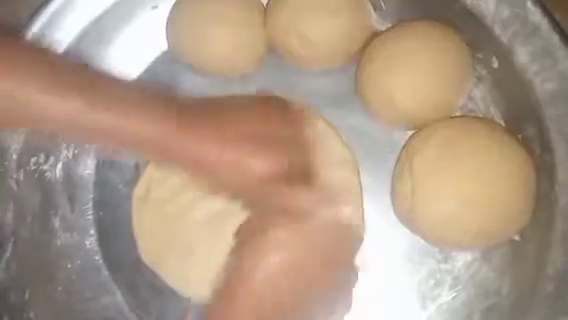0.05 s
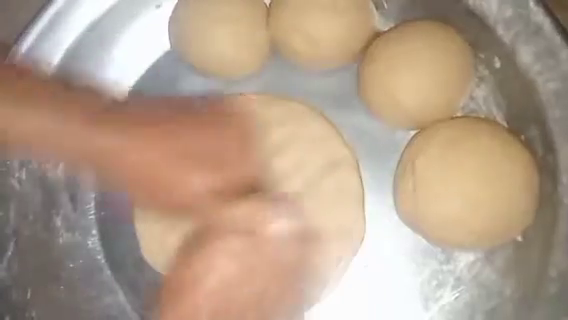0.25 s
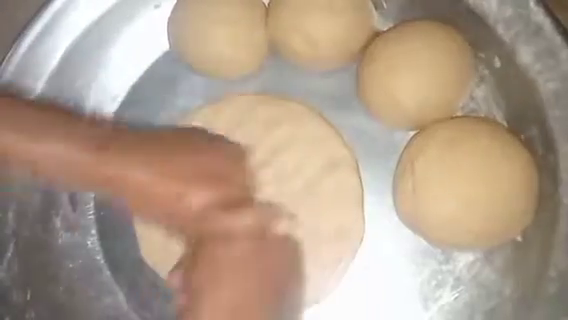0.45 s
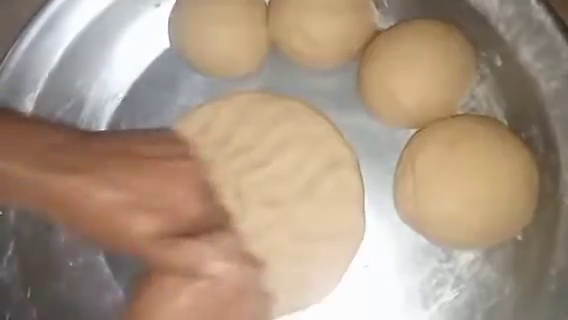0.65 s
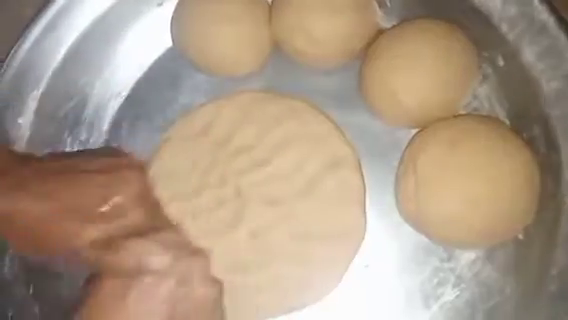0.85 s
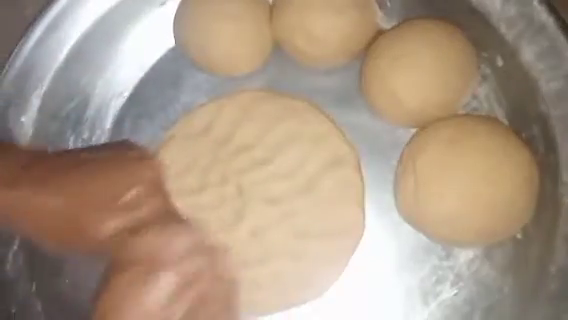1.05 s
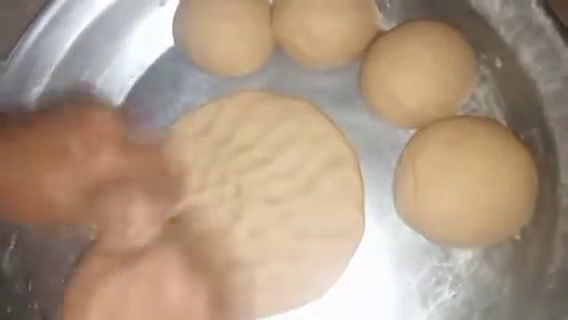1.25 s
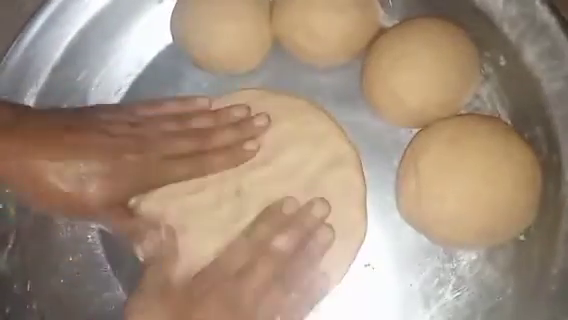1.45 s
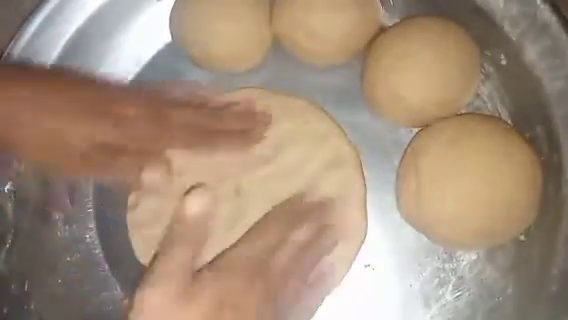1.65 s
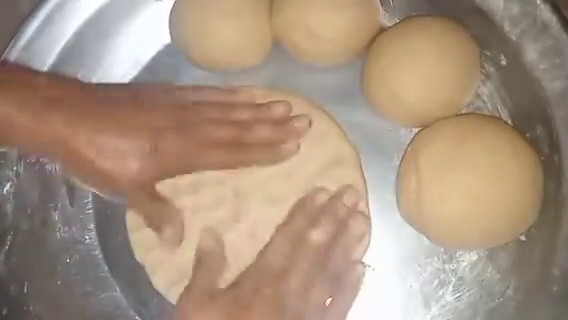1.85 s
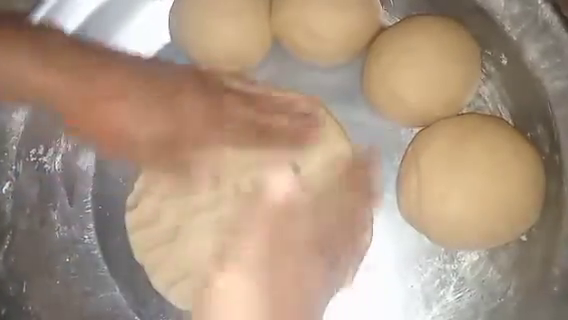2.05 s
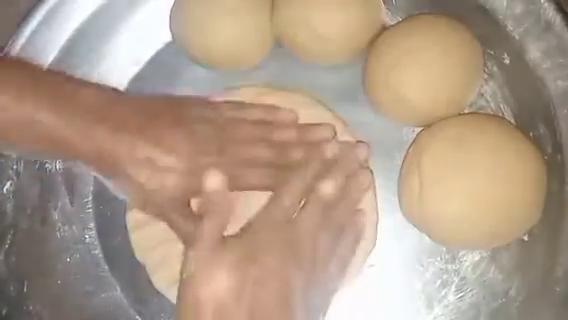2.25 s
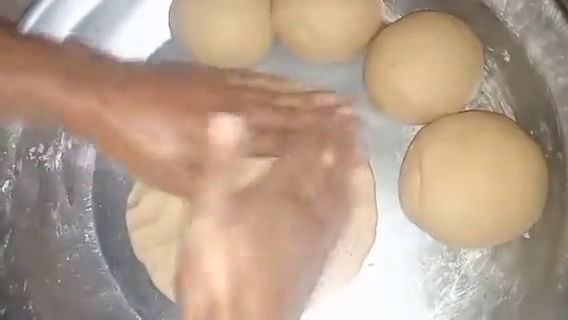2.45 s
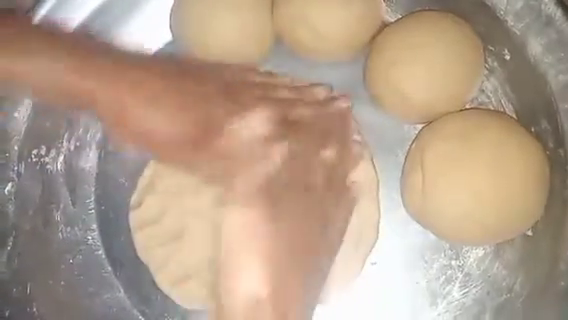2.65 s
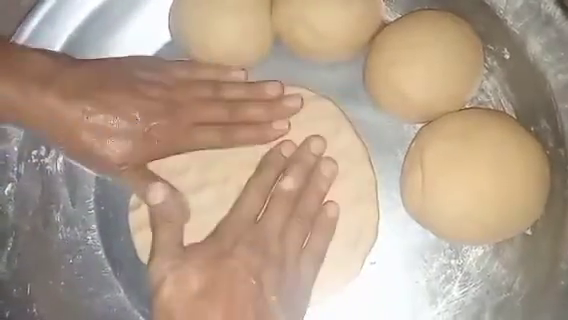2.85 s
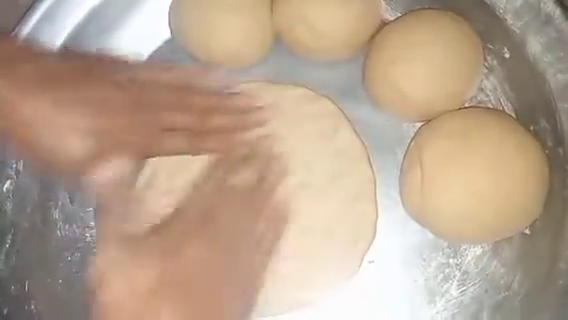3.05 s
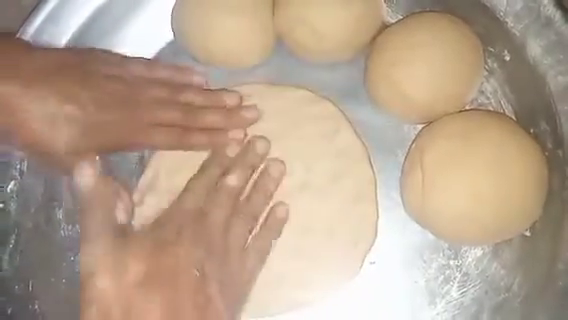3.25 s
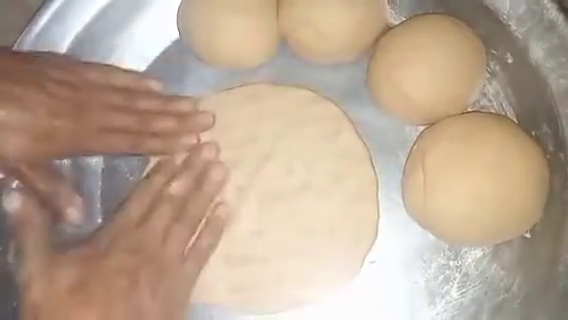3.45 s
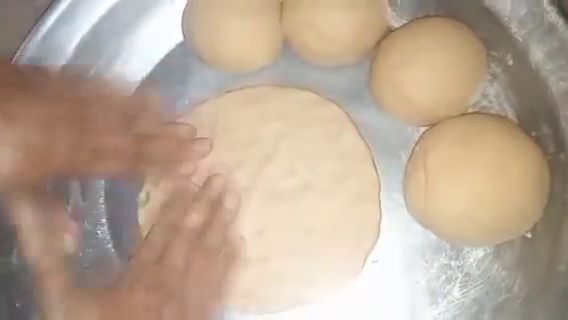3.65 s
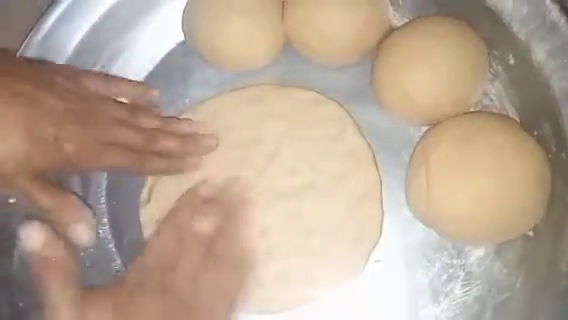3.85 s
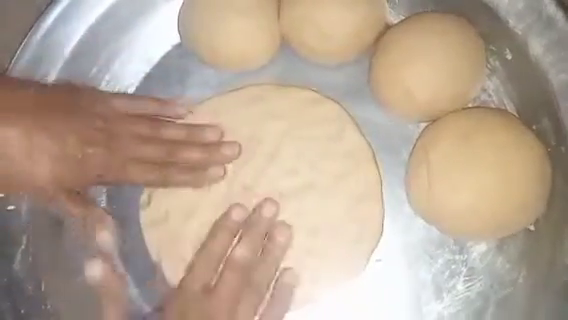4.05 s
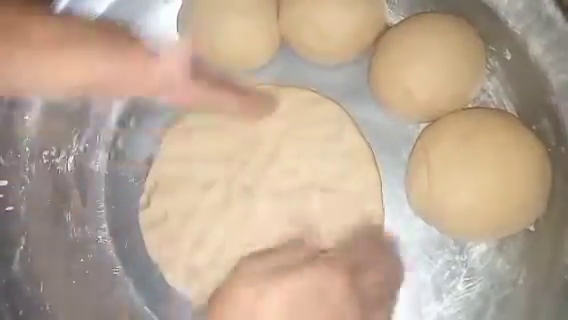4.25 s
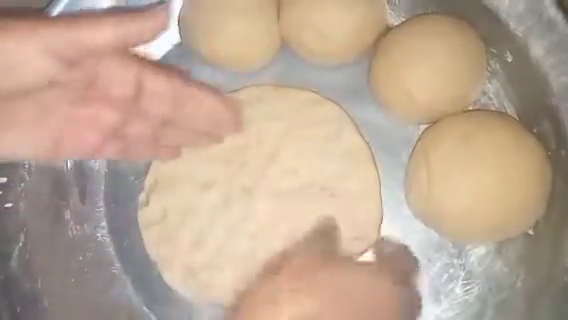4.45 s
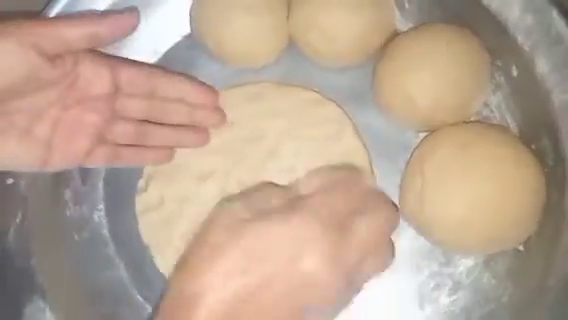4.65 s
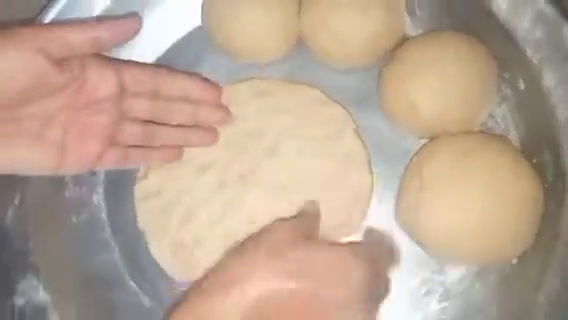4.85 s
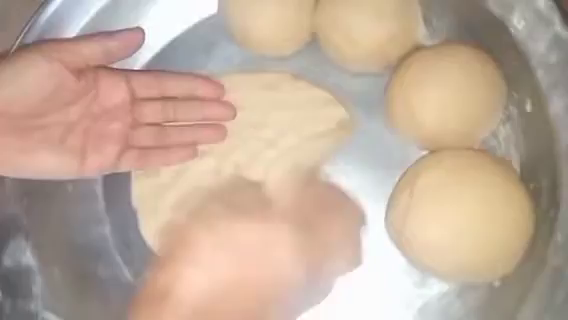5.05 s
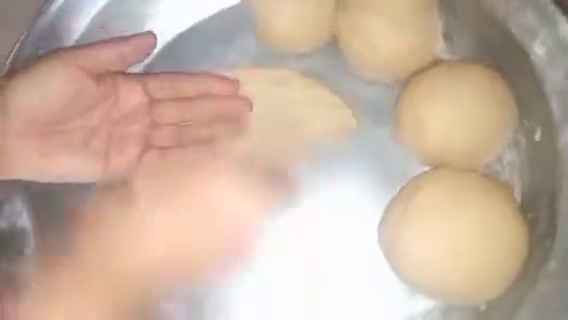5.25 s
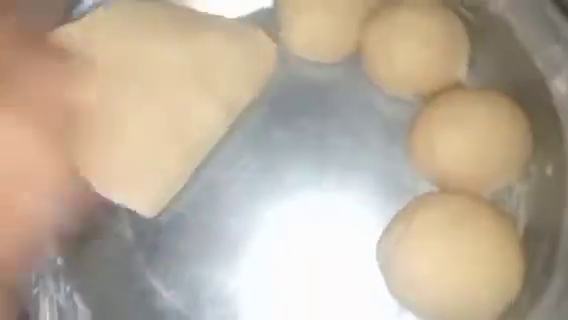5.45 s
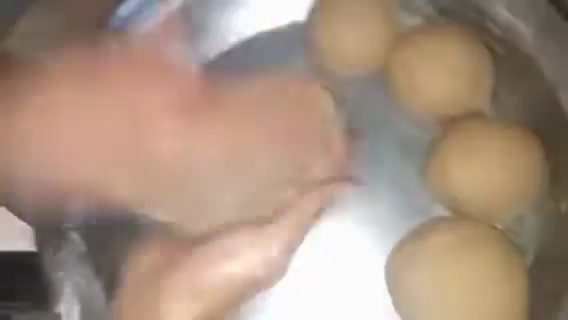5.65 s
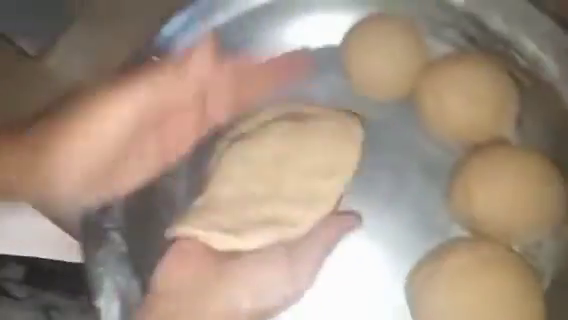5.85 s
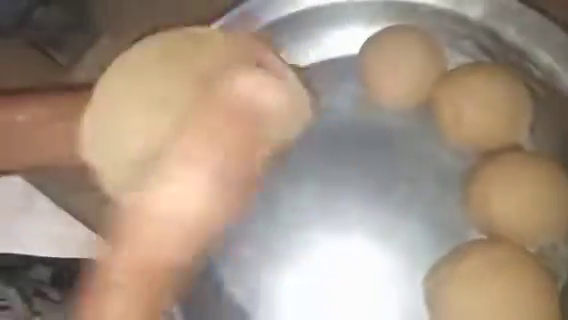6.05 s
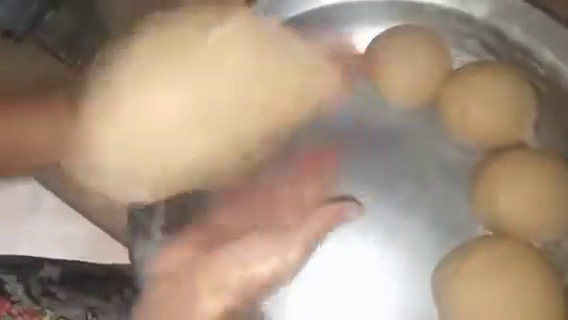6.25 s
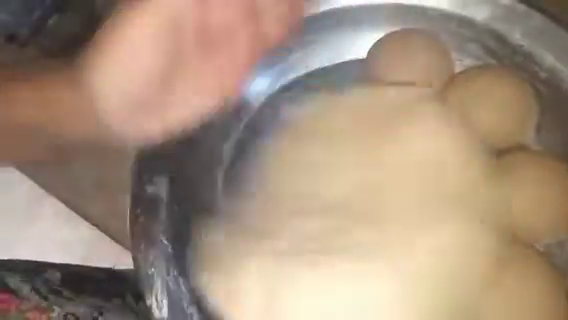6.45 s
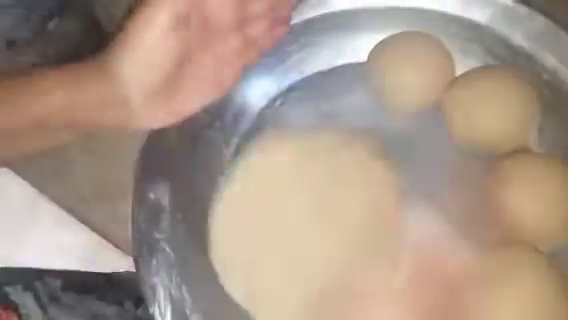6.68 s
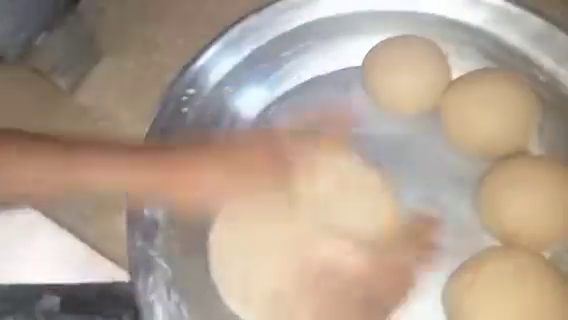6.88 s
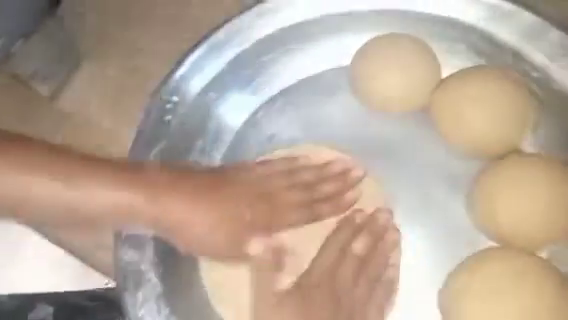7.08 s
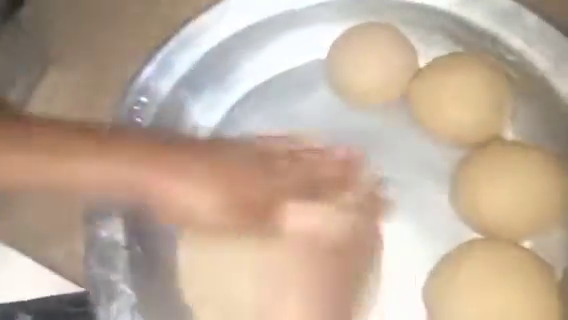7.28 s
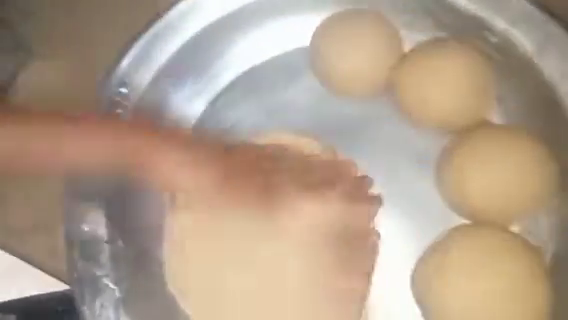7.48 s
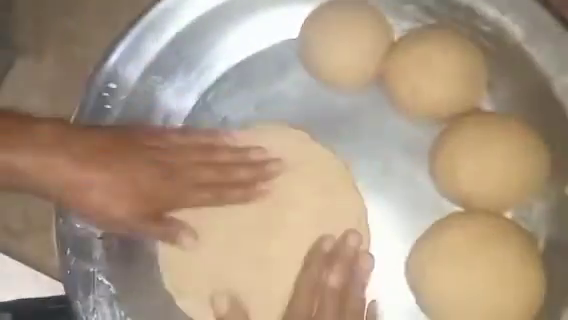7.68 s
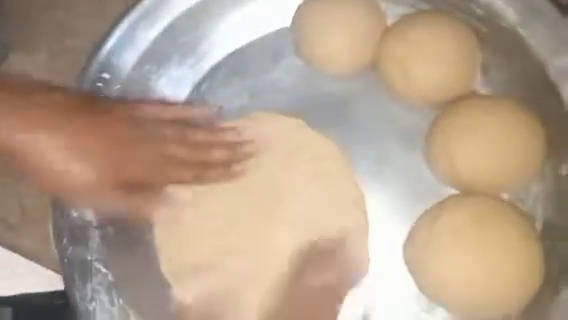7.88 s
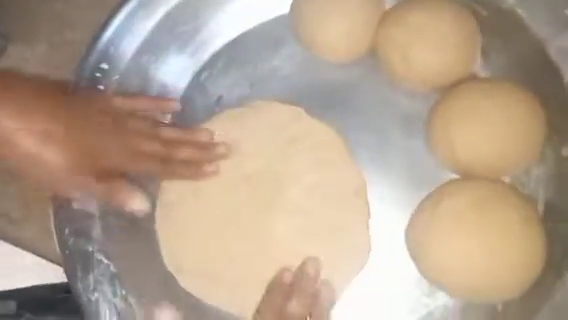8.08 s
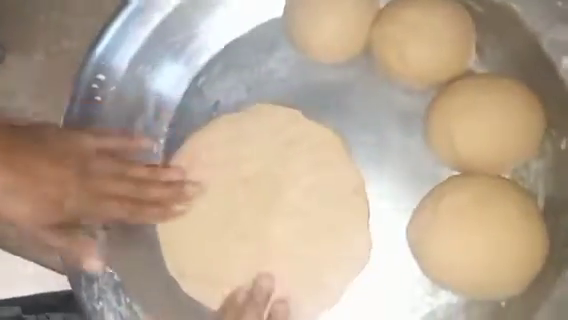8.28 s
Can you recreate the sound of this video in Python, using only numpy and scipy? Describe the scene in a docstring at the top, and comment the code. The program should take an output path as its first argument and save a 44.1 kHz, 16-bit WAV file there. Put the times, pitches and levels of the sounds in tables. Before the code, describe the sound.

A gas burner hisses steadily in a small kitchen. Close to the microphone, hands press stiff dough on a steel plate with soft, low, uneven thumps, light pats and faint rubbing. Two quick smacks follow as the dough is tossed between palms. Then one loud slap lands with a deep thud, a brief metallic ring and a short echo, and a few softer pats finish.

```python
"""In a small kitchen, hands press and pat stiff dough on a wide steel plate, toss it and slap it down.
Each push thumps, pops a little trapped air and sets off a low boom near 110 Hz that rises in pitch.
Bare palms smack the dough, and the slaps crack, ring the steel and echo off the walls.
Under it all runs a steady hiss with hollow tones, like a gas burner.
The phone starts close above the plate and draws back at the toss."""
import sys
import numpy as np
from scipy import signal
from scipy.fft import rfft, irfft, next_fast_len
from scipy.io import wavfile
from scipy.ndimage import uniform_filter1d, minimum_filter1d, map_coordinates

SR = 44100
rng = np.random.default_rng(int(sys.argv[2]) if len(sys.argv) > 2 else 0)


def store_wav(level_fs):
    """Save 16-bit WAV to argv[1]."""
    pcm = np.round(np.clip(np.atleast_2d(level_fs), -1, 1) * 32767)
    wavfile.write(sys.argv[1], SR, pcm.T.astype(np.int16))


N = 366912
TIME = np.arange(N) / SR


def undb(db):
    """Turn decibels into a number to multiply by."""
    return 10 ** (np.asarray(db) / 20)


def unit(x):
    """Scale a sound so that its average level (rms) is 1."""
    return x / np.sqrt(np.mean(x ** 2))


def add(out, start_s, x):
    """Mix x into out, beginning at start_s."""
    i = int(start_s * SR)
    out[i:i + len(x)] += x[:N - i]


def along(points, hz):
    """Read the value at hz off a curve drawn through (Hz, value) points."""
    point_hz, value = np.transpose(points)
    return np.interp(np.log(hz + 1), np.log(point_hz), value)


def noise(gain):
    """Noise at level 1; the function gain(hz) sets the share of each frequency."""
    size = next_fast_len(N, real=True)
    hz = np.arange(size // 2 + 1) * SR / size
    return unit(irfft(rfft(rng.standard_normal(size)) * gain(hz), size)[:N])


def wobble(rate_hz):
    """A smooth random drift, mostly between -1 and 1."""
    return noise(lambda hz: 1 / (1 + (hz / rate_hz) ** 2) ** 2)


def band(x, low_hz, high_hz, order=2):
    """Keep the part of a sound between two frequencies."""
    edges = [low_hz, min(high_hz, SR / 2 - 1)]
    return signal.sosfilt(signal.butter(order, edges, "band", fs=SR, output="sos"), x)


def colour(x, points, size=1024):
    """Reshape the tone of a sound to follow (Hz, dB) points."""
    hz = np.arange(size // 2 + 1) * SR / size
    cepstrum = irfft(np.log(undb(along(points, hz))))
    cepstrum[1:size // 2] *= 2  # folding this in half keeps the filter from sounding before a hit
    cepstrum[size // 2 + 1:] = 0
    response = irfft(np.exp(rfft(cepstrum)))
    return signal.fftconvolve(x, response / np.linalg.norm(response))[:N]


def swell(t, peak_s):
    """A loudness curve that rises to 1 at peak_s and dies away."""
    return t / peak_s * np.exp(1 - t / peak_s)


def crackle(fade_s):
    """Many tiny contacts push and pull at random as they die away."""
    t = TIME[:SR // 10]
    return np.sign(rng.standard_normal(len(t))) * np.exp(-t / fade_s)


def shimmer(x, depth_db=2.2, width_hz=60, hold_s=0.13, size=2048):
    """Narrow bands of a noise stand out for a moment and sink back at random."""
    hz, t, bands = signal.stft(x, SR, nperseg=size)
    places = np.meshgrid(hz / width_hz, t / hold_s, indexing="ij")
    levels = map_coordinates(rng.standard_normal(bands.shape), places, order=2, mode="mirror")
    return unit(signal.istft(bands * undb(depth_db * levels), SR)[1][:N])


def resonance(hz, centre_hz, width_hz):
    """A steep peak that lets through only the frequencies near centre_hz."""
    detune = (centre_hz ** 2 - hz ** 2) / ((hz + 1) * width_hz)
    return 1 / (1 + (np.sqrt(2) - 1) * detune ** 2)


# Hollow tones in the hiss. Each row: pitch in Hz, width in Hz, level in dB up close,
# level in dB once the phone has drawn back.
HOLLOW_TONES = [(113, 19, -57, -71), (309, 47, -57.5, -56), (349, 21, -51, -56), (881, 63, -59.5, -62),
                (960, 29, -52.3, -51.5), (1150, 25, -63, -72), (1268, 35, -66, -60),
                (1518, 50, -51.5, -48.5), (1616, 30, -58, -61), (1808, 27, -60, -64),
                (2045, 35, -57.5, -54.5), (2385, 70, -62, -51), (2605, 84, -49.5, -50),
                (2920, 70, -52.5, -46.5), (3590, 70, -54, -54), (3720, 50, -58, -54), (3825, 40, -53, -60),
                (3985, 60, -62, -52), (4240, 70, -54, -60), (4490, 70, -59, -64)]


def hollow_tones(far):
    """Narrow bands of noise waver like hollow notes; their balance shifts as far goes from 0 to 1."""
    centres, widths, close_db, far_db = np.transpose(HOLLOW_TONES)

    def tones(levels):
        def gain(hz):
            peaks = [level * unit(resonance(hz, centre, width))
                     for centre, width, level in zip(centres, widths, levels)]
            return np.linalg.norm(peaks, axis=0)
        return noise(gain) * np.linalg.norm(levels)

    return np.sqrt(1 - far) * tones(undb(close_db)) + np.sqrt(far) * tones(undb(far_db))


# Whistles of the gas jet. Each row: pitch in Hz, level in dB up close, level in dB from farther back.
JET_WHISTLES = [(3128, -48.2, -52), (3408, -52, -56)]


def whistles(far, wander_hz=14, chirp_db=6, chirps_per_s=15):
    """Thin whistles catch and drop in short chirps, each a little off pitch."""
    out = np.zeros(N)
    for centre_hz, close_db, far_db in JET_WHISTLES:
        hz = centre_hz + wander_hz * wobble(16.1)
        chirps = undb(chirp_db * np.minimum(wobble(chirps_per_s), 1))
        tone = unit(chirps * np.sin(2 * np.pi * np.cumsum(hz) / SR))
        out += tone * undb((1 - far) * close_db + far * far_db)
    return out


# The tone of the gas jet's hiss. Each row: frequency in Hz, relative level in dB.
JET_COLOUR = [(1500, -63), (2200, -24), (2750, -1), (3100, 3), (3750, 2), (4100, 0), (4350, -2.5),
              (4800, -10.5), (5500, -18.5), (6800, -20.5), (8400, -27), (10000, -35.9), (12500, -39.6),
              (15500, -43.6)]
# The tone of the flame's low roar. Each row: frequency in Hz, relative level in dB.
FLAME_COLOUR = [(25, -30), (45, -10), (70, -3), (120, 5), (170, -9.5), (240, -1), (400, -6.6), (520, -8.4),
                (660, -14), (800, -13.3), (1200, -7), (1800, -4.5), (2400, 4)]


def burner(jet_db=-39.5, roar_db=-42.5, roar_top_hz=2700, sizzle_db=-72, draw_back_s=5.84, move_s=0.16):
    """A gas jet hisses over the fluttering roar of its flame; the tone shifts as the phone draws back."""
    jet = shimmer(noise(lambda hz: undb(along(JET_COLOUR, hz))))
    jet *= undb(jet_db + 0.8 * wobble(51))
    roar = shimmer(noise(lambda hz: undb(along(FLAME_COLOUR, hz)) / (1 + (hz / roar_top_hz) ** 10)))
    roar *= undb(roar_db + 1.05 * wobble(32))
    far = (1 + np.tanh((TIME - draw_back_s) / move_s)) / 2  # 0 close to the plate, 1 drawn back
    tones = hollow_tones(far) + whistles(far)
    sizzle = undb(sizzle_db) * far * unit(band(rng.standard_normal(N), 6000, 10500))
    return jet + roar + tones + sizzle


# How long the kitchen echoes. Each row: frequency in Hz, seconds to fade by 60 dB.
ECHO_TIMES = [(150, 0.2), (800, 0.25), (2500, 0.26), (4000, 0.2), (12000, 0.35)]


def kitchen(x, build_s=0.00078):
    """The hard walls of a small room answer a sound with dense, short echoes."""
    t, tail = TIME[:SR // 2], 0
    edges = np.geomspace(100, 16000, 9)
    for low_hz, high_hz in zip(edges, edges[1:]):
        echo_s = along(ECHO_TIMES, np.sqrt(low_hz * high_hz))
        fade = np.exp(-np.log(1000) * t / echo_s)
        tail += band(rng.standard_normal(len(t)), low_hz, high_hz) * fade
    tail *= 1 - np.exp(-(t / build_s) ** 2)
    return signal.fftconvolve(x, tail / np.linalg.norm(tail))[:N]


# The tone of a slap coming back off the walls. Each row: frequency in Hz, relative level in dB.
WALL_COLOUR = [(100, -12), (250, 1), (550, -1), (760, 4), (1050, 3), (1400, 2), (1900, 0.5), (2500, -1),
               (3300, 4.5), (4100, -8), (5200, -28), (7000, -27), (10000, -42), (15000, -50)]


def slap_echoes(echo_db=14.8, delay_s=0.0062):
    """The walls return each slap (see HAND_SLAPS below) as one dense, even wash."""
    blows = np.zeros(N)
    for start_s, db in HAND_SLAPS:
        add(blows, start_s + delay_s, undb([db + echo_db]))
    return kitchen(colour(blows, WALL_COLOUR))


# Skin coming off the dough. Each row: start in seconds, level in dB.
SKIN_PEELS = [(.160, -55), (.465, -58), (1.420, -56), (2.170, -56), (3.16, -58), (4.305, -57), (6.184, -57),
              (6.508, -54), (7.889, -53), (8.195, -55)]


def peels(fade_s=0.003, faint_count=10, faint_db=-61):
    """Sticky skin peels away with tiny ticks; a few fainter ones fall at random times."""
    out = np.zeros(N)
    faint = [(start_s, faint_db) for start_s in TIME[-1] * rng.random(faint_count)]
    for start_s, db in list(SKIN_PEELS) + faint:
        add(out, start_s, undb(db) * band(crackle(fade_s), 2000, 15000))
    return out


# Sliding hands. Each row: loudest moment in seconds, level in dB, half the length in seconds,
# lowest and highest frequency in Hz.
SKIN_RUBS = [(1.47, -51, .04, 460, 900), (3.135, -40.5, .04, 2400, 4500), (3.66, -43, .03, 2400, 4400),
             (4.648, -39, 0.028, 1400, 4300), (5.07, -46, .05, 1000, 3400), (5.33, -54, .11, 450, 1300),
             (5.947, -42, .006, 600, 1700), (5.972, -39, 0.011, 540, 1400), (6.577, -39, 0.018, 1100, 2700),
             (7.32, -41, 0.1, 1700, 4200), (7.492, -42, 0.027, 1300, 3800),
             (8.235, -39.5, 0.035, 1700, 4200), (8.22, -56, 0.11, 450, 1090)]


def rubs(grain_db=4):
    """Skin brushes over floured dough and steel in small uneven slips."""
    out = np.zeros(N)
    slips = undb(grain_db * wobble(160)) * rng.standard_normal(N)
    for peak_s, db, half_s, low_hz, high_hz in SKIN_RUBS:
        stroke = np.exp(-((TIME - peak_s) / half_s) ** 2)
        out += undb(db) * stroke * unit(band(slips, low_hz, high_hz, order=4))
    return out


# The toss. One row: start in seconds, level in dB, seconds to swell, pitch in Hz.
DOUGH_TOSS = (5.64, -47, 0.17, 108.5)


def toss():
    """A low boom keeps murmuring while the dough is tossed between the palms."""
    out, t = np.zeros(N), TIME[:SR // 2]
    start_s, db, swell_s, hz = DOUGH_TOSS
    envelope = swell(t, swell_s) * (1 - (t / t[-1]) ** 2)
    add(out, start_s, undb(db) * envelope * np.sin(2 * np.pi * hz * t))
    return out


# Pushes on the dough. Each row: start in seconds, thump level in dB, thump pitch in Hz (higher for a
# quicker push), boom level in dB, seconds the hand bears down.
DOUGH_PUSHES = [(0.052, -35, 78, -41, .075), (0.149, -34, 78, -38.5, 0.07), (0.57, -29.5, 78, -35, 0.058),
                (1.071, -30.5, 84, -47, 0.028), (1.53, -32, 99, -30, 0.055), (1.719, -35, 84, -48, 0.058),
                (2.068, -35, 88.5, -38.5, .055), (3.05, -38, 80, -46, 0.049), (3.189, -41, 108, -52, .04),
                (3.321, -40, 125, -52, .03), (3.642, -30, 78.5, -52, 0.02), (3.675, -44, 100, -33, .06),
                (3.945, -21.5, 94, -27, .018), (4.012, -39, 112, -29.5, 0.045), (4.208, -28, 136, -47, .02),
                (4.25, -39, 110, -32, .055), (4.345, -47, 105, -38, .03), (6.983, -21, 84, -18.3, 0.078),
                (7.283, -27, 116, -31.5, 0.075), (7.615, -30.5, 106, -32, .055),
                (7.978, -39.5, 77, -46, .05), (8.227, -39.5, 66.4, -47, .05)]


def pushes(boom_hz=101.3, top_hz=120, rise_hz_per_s=220, attack_s=0.018, release_s=0.022, squash_db=-18):
    """Pushed dough thumps and squashes, with a low boom that rises in pitch as the hand bears down."""
    low_tones, load, t = toss(), np.zeros(N), TIME[:SR // 2]
    pitch_hz = np.minimum(boom_hz + rise_hz_per_s * t, top_hz)
    boom = np.sin(2 * np.pi * np.cumsum(pitch_hz) / SR)
    for start_s, thump_db, thump_hz, boom_db, hold_s in DOUGH_PUSHES:
        thump = swell(t, 0.69 / thump_hz) ** 1.7 * np.sin(2 * np.pi * thump_hz * t)
        press = 1 - np.exp(-(t / attack_s) ** 2)
        let_go = np.exp(-np.maximum(t - hold_s, 0) / release_s)
        weight = undb(boom_db) * press * let_go
        add(low_tones, start_s, undb(thump_db) * thump + weight * boom)
        add(load, start_s, weight)
    uneven = undb(0.8 * wobble(18))
    squash = undb(squash_db) * load * unit(band(rng.standard_normal(N), 60, 280))
    return low_tones * uneven + squash


def pop(hz, fade_s=0.0069, spread=1.55, skin_db=-17):
    """Air squeezed from under a palm pops at its pocket's pitch, with a bright smack of skin on top."""
    contact = crackle(fade_s)
    pocket = unit(band(contact, hz / spread, hz * spread, order=4))
    smack = unit(band(contact, 2300, 3400, order=4))
    return contact.std() * (pocket + undb(skin_db) * smack)


def trapped_air(pop_hz=308, pop_db=-12.5, db_per_octave=10):
    """Every push pops a little trapped air, louder the quicker the push is."""
    out = np.zeros(N)
    for start_s, thump_db, thump_hz, _, _ in DOUGH_PUSHES:
        quickness_db = db_per_octave * np.log2(thump_hz / 100)
        add(out, start_s, undb(thump_db + pop_db + quickness_db) * pop(pop_hz))
    return out


# Palms meeting the dough. Each row: start in seconds, relative level in dB, pitch in Hz,
# spread (the top of the pop's band divided by its pitch).
PALM_PATS = [(0.572, -42, 600, 1.3), (1.069, -37, 1490, 1.2), (3.331, -38, 380, 1.53),
             (3.655, -42.5, 660, 1.4), (3.929, -31.5, 1100, 1.8), (4.248, -34, 250, 1.4),
             (5.662, -24, 1130, 1.42), (5.9535, -23, 950, 2.7), (6.9668, -30, 1080, 1.35),
             (6.9735, -24, 1900, 1.8), (6.9765, -16, 930, 1.45), (7.284, -43, 1010, 1.9)]


def pats(fade_s=0.0046, flesh_db=-15, flesh_hz=290):
    """A bare palm lands with a short smack over a softer, fleshy pop."""
    out = np.zeros(N)
    for start_s, db, hz, spread in PALM_PATS:
        smack = pop(hz, fade_s, spread)
        add(out, start_s, undb(db) * (smack + undb(flesh_db) * pop(flesh_hz)))
    return out


# Notes of the air in a cupped palm. Each row: pitch in Hz, relative level in dB, seconds to swell.
CUPPED_AIR = [(595, -10, .0022), (770, -1.5, .0015), (970, 0.5, .0017), (1250, -4, .0012),
              (1510, -2, .0013)]


def catch(start_s=5.9538, catch_db=-20):
    """The tossed dough lands in a cupped palm; the trapped air answers with short hollow notes."""
    out, t = np.zeros(N), TIME[:SR // 10]
    for hz, db, swell_s in CUPPED_AIR:
        add(out, start_s, undb(catch_db + db) * swell(t, swell_s) * np.sin(2 * np.pi * hz * t))
    return out


# Notes of the steel plate. Each row: pitch in Hz, relative level in dB, seconds to fade by 60 dB.
PLATE_NOTES = [(476, 3, .22), (742, 7, .15), (785, -2, .2), (833, -2, .22), (880, -1, .22), (1008, 6, .1),
               (1031, -2, .22), (1168, -1.5, .22), (1255, -3, .22), (1482, -6, .2), (1595, 2, .22),
               (2110, -5, .22), (2290, -6, .17), (2441, 0, .2), (2630, -1, .18), (2710, -3, .16),
               (2860, -2, .15), (3010, 0, .18), (3095, 1, .15), (3235, 1, .12), (3411, -1, .15)]


def plate_ring(ring_db=-29, build_s=0.0013):
    """Each part of a slapping hand feeds energy into the steel; the dough soon stops the ringing."""
    out, t = np.zeros(N), TIME[:SR // 2]
    power = sum(undb(db) ** 2 * (t >= delay_s) * np.exp(-np.abs(t - delay_s) / build_s)
                for delay_s, db in HAND_PARTS) / (build_s * SR)
    for hz, note_db, ring_s in PLATE_NOTES:
        kept_per_sample = np.exp(-2 * np.log(1000) / (ring_s * SR))
        energy = signal.lfilter([1], [1, -kept_per_sample], power + 1e-18)
        for start_s, db in HAND_SLAPS:
            tone = np.sin(2 * np.pi * (hz * t + rng.random()))
            add(out, start_s, undb(ring_db + db + note_db) * np.sqrt(energy) * tone)
    return out


# Flat-handed slaps. Each row: start in seconds, relative level in dB.
HAND_SLAPS = [(6.9806, -1.3), (7.285, -27.5)]
# Fingertips, fingers, palm and heel landing in turn. Each row: delay in seconds, relative level in dB.
HAND_PARTS = [(0, -5), (.0015, -2), (.0044, -3), (.0082, -3.8)]
# The tone of a slap's crack. Each row: frequency in Hz, relative level in dB.
CRACK_COLOUR = [(100, -9), (230, -4), (470, 2), (610, -9), (740, 4.5), (1050, 4), (1330, -2), (1900, -3.5),
                (2600, 0), (3200, 2.5), (3900, -6), (4450, -11), (5200, -29), (6800, -24), (10000, -39),
                (15000, -49)]


def slaps(fade_s=0.0026, puff_db=-31, puff_hz=52, puff_swell_s=0.02):
    """The parts of the hand crack down a split second apart and push a deep puff of air at the phone."""
    cracks, puffs, t = np.zeros(N), np.zeros(N), TIME[:SR // 4]
    puff = swell(t, puff_swell_s) * np.sin(2 * np.pi * puff_hz * t)
    for start_s, db in HAND_SLAPS:
        for delay_s, part_db in HAND_PARTS:
            add(cracks, start_s + delay_s, undb(db + part_db) * crackle(fade_s))
        add(puffs, start_s, undb(db + puff_db) * puff)
    return colour(cracks, CRACK_COLOUR) + puffs


def scene(room_db=-9):
    """Mix hands, plate, kitchen echoes and burner into one channel."""
    palms = pats() + trapped_air() + catch()
    echoes = kitchen(undb(room_db) * palms) + slap_echoes()
    return (palms + echoes + pushes() + slaps() + plate_ring() + rubs() + peels() + burner())[None]


def record(dry, low_cut_hz=48, threshold_db=-19, release_s=0.11, squeeze=0.29, ceiling=0.94, top_hz=15500):
    """The phone thins the bass, turns down briefly after a loud slap, holds peaks and cuts the top."""
    x = signal.sosfilt(signal.butter(4, low_cut_hz, "high", fs=SR, output="sos"), dry)
    window = SR // 200  # 5 milliseconds
    loudness = np.sqrt(np.abs(signal.lfilter(np.ones(window) / window, 1, x[0] ** 2)))
    excess = np.log(np.maximum(loudness / undb(threshold_db), 1))
    # remember each peak, then let it fade
    held = np.maximum.accumulate(excess * np.exp(TIME / release_s)) * np.exp(-TIME / release_s)
    ducked = x * np.exp(-squeeze * held)
    safe_gain = ceiling / np.maximum(np.abs(ducked), ceiling)
    limited = ducked * uniform_filter1d(minimum_filter1d(safe_gain, size=45), size=45)
    return signal.sosfilt(signal.ellip(10, .2, 70, top_hz, fs=SR, output="sos"), limited)


dry = scene()
out = record(dry)
store_wav(out)
```